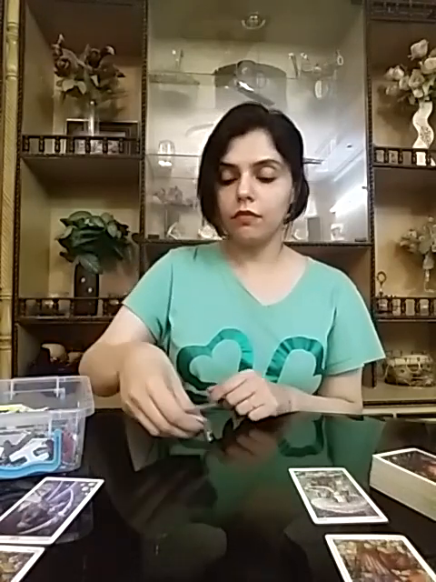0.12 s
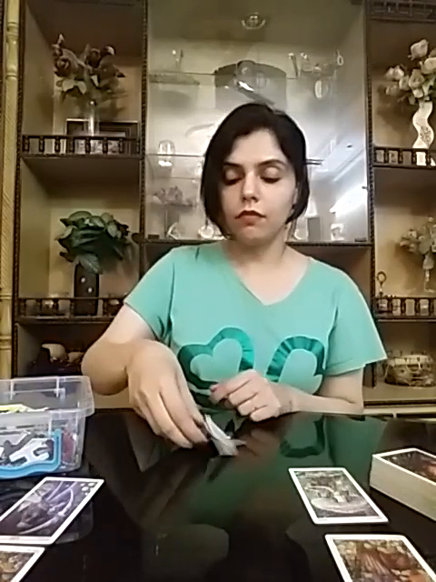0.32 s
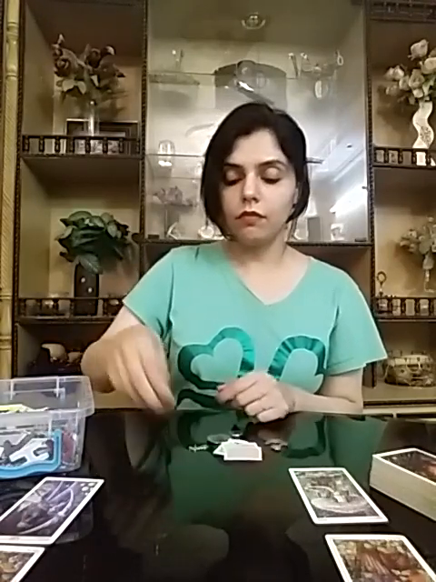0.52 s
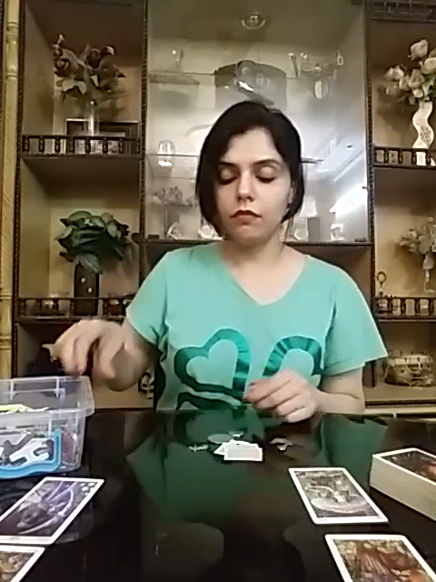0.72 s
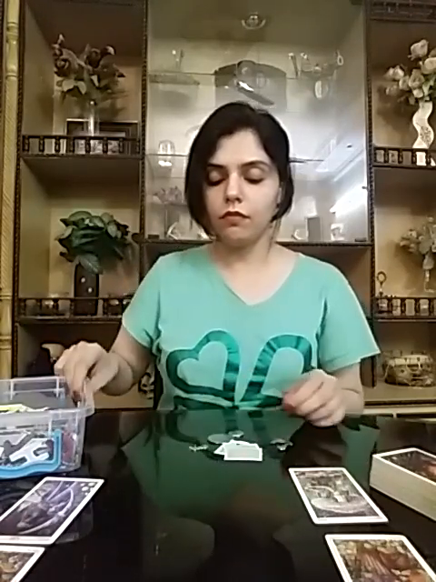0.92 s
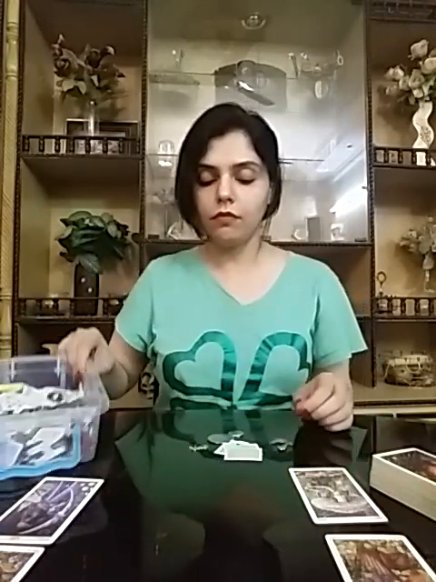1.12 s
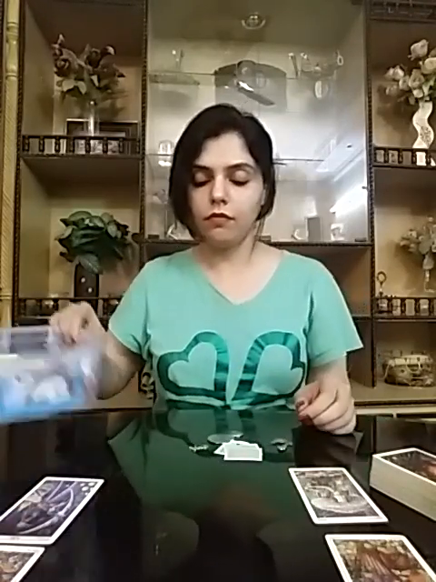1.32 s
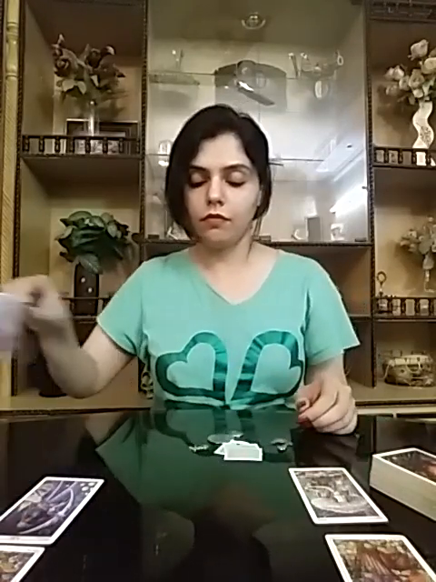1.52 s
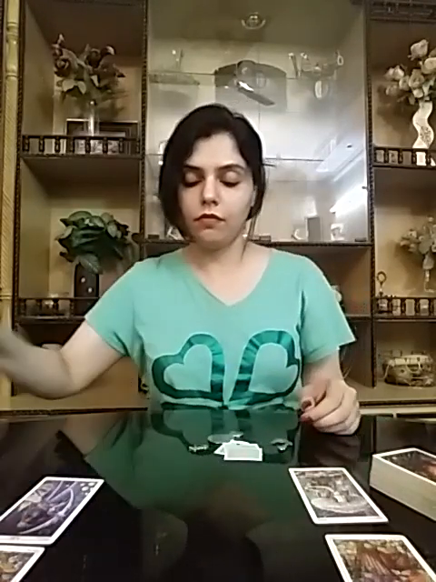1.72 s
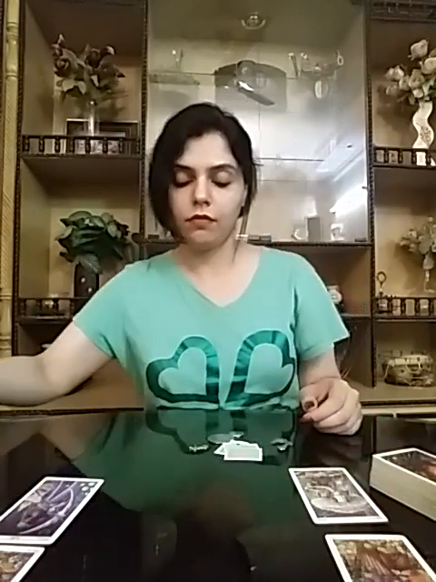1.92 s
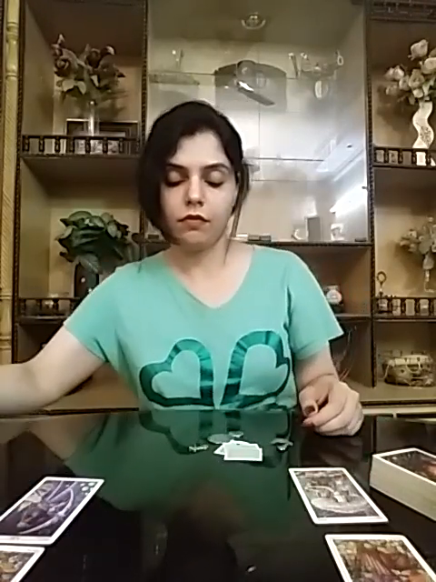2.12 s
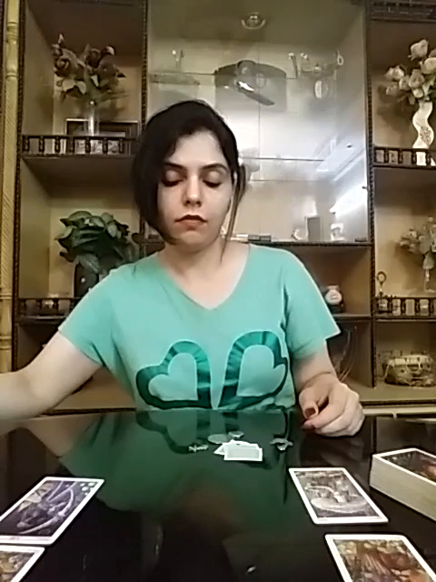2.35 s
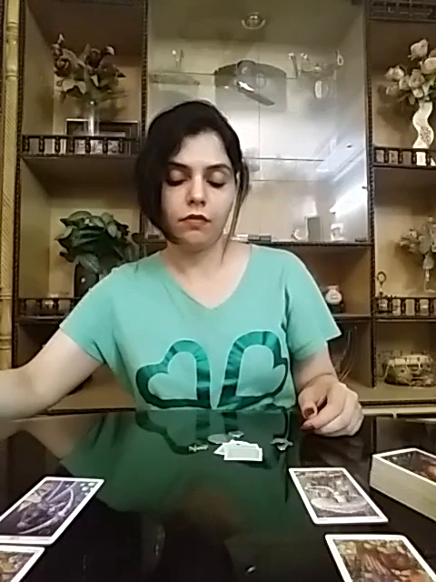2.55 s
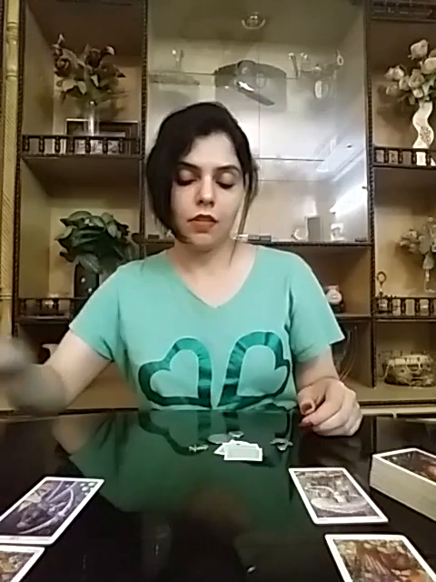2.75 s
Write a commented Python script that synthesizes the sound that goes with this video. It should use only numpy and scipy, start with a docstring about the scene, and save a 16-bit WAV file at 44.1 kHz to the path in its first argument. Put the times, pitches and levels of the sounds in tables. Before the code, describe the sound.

Small metal charms clatter onto a hard tabletop, then their plastic box is clacked down nearby

```python
"""A handful of small metal charms drops on a hard tabletop: random taps shaped into clatter, with ringing modes,
then a fine shiver to rest. Their plastic box is picked up, knocked by the fingers, the charms left inside
sliding and clicking; its plastic snaps once. Last, it is set down with two sharp clacks, made of short
blows that thump the support and jolt the contents. Throughout, a small, live room adds decaying echoes,
and filtered noise and a wavering sine make soft room noise and a low hum."""
import sys
import numpy as np
from scipy import signal
from scipy.fft import rfft, irfft
from scipy.io import wavfile
from scipy.ndimage import uniform_filter1d

SR = 44100
rng = np.random.default_rng(int(sys.argv[2]) if len(sys.argv) > 2 else 0)


def unload_wav(signal):
    """Save mono or channel-first audio to the path in sys.argv[1] as 16-bit WAV at rate SR, clipped to [-1, 1]."""
    wavfile.write(
        sys.argv[1],
        SR,
        np.round(np.clip(np.atleast_2d(signal).T, -1, 1) * 32767).astype(np.int16),
    )


N = 123480
T = np.arange(N) / SR  # time of each sample, s

# All colours are relative: only their shape over pitch counts, and the level is set apart.
# Charms landing on the table. Each row: start in seconds, level in dB.
LANDINGS = [(.2208, -17.5), (.2365, -24.5), (.2685, -27), (.2708, -24.5), (.2802, -19), (.3062, -28),
            (.3268, -22), (.3313, -19.5), (.3445, -24), (.3610, -19.5), (.3675, -18), (.3703, -23),
            (.3877, -16.5), (.3955, -23), (.4051, -26), (.4227, -18), (.4443, -21), (.4466, -20.5),
            (.4512, -17.5), (.4689, -33), (.4850, -22), (.4925, -21), (.4996, -22), (.5027, -17),
            (.5111, -21), (.5542, -15.5), (.5562, -18.5), (.5640, -23), (.5823, -41), (.5932, -21),
            (.6011, -20), (.6035, -19.5), (.6312, -23), (.6345, -22.5), (.6500, -32), (.6646, -20)]
# Colour of a charm striking the table. Each row: pitch in Hz, level in dB.
LANDING_COLOUR = [(30, -54), (60, -36), (95, -18), (140, -21), (300, -13.5), (700, -15.5), (1200, -11.5),
                  (1650, -2.5), (2050, 2), (2500, 1), (3100, -8.5), (3850, -1), (4700, -10.5),
                  (6500, -26.5), (10000, -65), (16000, -16)]
# Modes (natural tones) of the tabletop. Each row: pitch in Hz, level before halving in dB,
# time to fade by 60 dB in seconds.
TABLE_MODES = [(1536, -46, 0.15), (1732, -46.5, 0.097), (2074, -44, .09), (2362, -47, 0.28)]
# Loudness of the small bounces between landings. Each row: time in seconds, level in dB.
BOUNCE_LEVEL = [(.22, -47), (.26, -42.5), (.32, -36.5), (.345, -31.5), (.395, -27.5), (.418, -31.5),
                (.445, -26.5), (.53, -30), (.61, -29.5), (.66, -30.5), (.69, -45), (.74, -71)]
# Colour of the small bounces. Each row: pitch in Hz, level in dB.
BOUNCE_COLOUR = [(30, -58), (60, -35), (95, -11), (140, -27), (280, -24.5), (700, -8), (1200, -11),
                 (2000, -1.5), (2600, 3.5), (3200, -3), (3900, -2.5), (4800, -8), (6600, -11),
                 (8000, -10.5), (10200, -21), (13000, -18.5), (16000, -37)]
# Loudness of the last charms shivering to rest. Each row: time in seconds, level in dB.
SHIVER_LEVEL = [(.64, -31), (.68, -38), (.755, -35), (.805, -41.5), (.819, -29), (.835, -36), (.89, -37),
                (.95, -35.5), (.972, -40), (.985, -42)]
# Colour of the shiver. Each row: pitch in Hz, level in dB.
SHIVER_COLOUR = [(60, -39), (300, -23), (800, -17), (1600, -13.5), (2450, -2), (3100, -4.5), (4600, -13),
                 (5600, -14.5), (6800, -20.5), (9000, -24.5), (12000, -28.5), (14500, -35), (15400, -24),
                 (16000, -28)]
# A charm ringing as it chatters. Each row: start in seconds, length in seconds, pitch in Hz,
# level in dB within the ringing layer, change of tap strength over its length in dB.
RINGS = [(0.215, 0.022, 9060, -50, 7), (0.258, 0.16, 9030, -47.5, 1), (.222, 0.13, 11700, -54, 8),
         (.295, 0.022, 14900, -45, 0), (0.3275, 0.01, 15170, -27, -14), (0.328, 0.07, 9080, -37.5, 3),
         (0.336, 0.27, 11720, -46.5, -6), (0.358, 0.0085, 5505, -21.5, 16), (.37, .16, 15230, -44, -10),
         (0.42, 0.011, 15100, -35, 2), (0.384, 0.53, 5500, -44, -31), (0.397, 0.14, 5740, -43.5, 17),
         (0.456, 0.0027, 8960, -22.5, -6), (0.489, 0.12, 8870, -34.5, -1), (0.614, 0.0051, 8900, -21, 0),
         (0.666, 0.051, 8970, -49, -35)]
# Fingers knocking the box as it is lifted. Each row: start in seconds, level in dB.
KNOCKS = [(.9928, -28.5), (.9962, -40.5), (1.1724, -32), (1.1765, -35.5), (1.187, -44), (1.4428, -44)]
# Colour of a knock. Each row: pitch in Hz, level in dB.
KNOCK_COLOUR = [(40, -30), (95, 0), (150, -13), (260, -1.5), (450, -0.5), (800, 2.5), (1150, -7.5),
                (1600, -7.5), (2300, -16), (4000, -17), (6500, -26), (16000, -63)]
# Charms clicking inside the box. Each row: start in seconds, level in dB.
CLICKS = [(1.1335, -42.5), (1.140, -39), (1.156, -58), (1.2605, -40), (1.335, -63), (1.432, -55),
          (1.4430, -33), (2.0505, -66)]
# Colour of a click. Each row: pitch in Hz, level in dB.
CLICK_COLOUR = [(100, -18), (600, -15), (1100, 5), (1600, -1), (2400, 11), (3100, -4), (3900, -16),
                (5200, -3), (6500, -31), (16000, -34)]
# Charms sliding in the carried box. Each row: time in seconds, level in dB within the sliding layer.
SLIDE_LEVEL = [(1.11, -59), (1.13, -41.5), (1.145, -43.5), (1.20, -40.5), (1.255, -50), (1.30, -52),
               (1.32, -42), (1.365, -50), (1.41, -44), (1.45, -46), (1.50, -56.5), (1.94, -72.5),
               (1.98, -50), (2.03, -69), (2.056, -44.5), (2.09, -63)]
# Colour of the sliding. Each row: pitch in Hz, level in dB.
SLIDE_COLOUR = [(100, -14), (400, -5.5), (800, 1), (1150, -5.5), (1600, -1), (2400, 0.5), (3100, -6),
                (4000, -5.5), (5300, -15.5), (6500, -27), (16000, -36.5)]
# Modes of the box's plastic as it snaps. Each row: pitch in Hz, level within the ring in dB,
# time to fade by 60 dB in seconds.
SNAP_MODES = [(620, -12, 0.064), (1480, -2, 0.03), (2130, -5, 0.029), (2330, -4, 0.031), (2700, -22, .016),
              (3900, -9, 0.026)]
# Colour of the snap's tick. Each row: pitch in Hz, level in dB.
SNAP_TICK_COLOUR = [(100, -19), (600, 1), (2000, 17), (4000, -20), (7000, -8), (16000, -25)]
# The box set down. Each row: start in seconds, then the levels of the clack, the thump
# and the jolt of the contents in dB.
SET_DOWN = [(2.3103, -19, -18, -19), (2.3250, -24, -34, -22.5), (2.358, -24, -30.5, -34),
            (2.508, -15.5, -29.5, -27)]
# The contents falling back after the jolt. Each row: start in seconds, level in dB.
FALL_BACK = [(2.3126, -20.5), (2.5178, -24.5), (2.5195, -35)]
# Colour of a clack. Each row: pitch in Hz, level in dB.
CLACK_COLOUR = [(60, -26), (200, -16), (400, -10.5), (620, -3), (850, 4.5), (1080, 2), (1500, -1),
                (2300, -4.5), (3000, -8), (4100, -14.5), (5200, -15.5), (7500, -36), (16000, -73)]
# Colour of a thump. Each row: pitch in Hz, level in dB.
THUMP_COLOUR = [(30, -25), (55, -40), (85, 0), (120, -7.5), (170, -14.5), (230, -8.5), (370, -6),
                (550, -5.5), (800, -30), (2000, -45), (16000, -55)]
# Colour of the jolted contents. Each row: pitch in Hz, level in dB.
JOLT_COLOUR = [(100, -12.5), (600, -1), (1100, -10), (1700, -2), (2300, 1), (2750, -3.5), (3300, -1.5),
               (4100, -4), (4900, -22), (7000, -25.5), (10000, -36.5), (14500, -40), (16000, -41)]
# How long the room's echoes last. Each row: pitch in Hz, time to fade by 60 dB in seconds.
ROOM_DECAY = [(100, 1.13), (260, .5), (700, 0.54), (1840, 0.4), (4850, 0.5056), (9000, 0.5742),
              (16000, 1.05)]
# Colour of the room noise. Each row: pitch in Hz, level in dB.
NOISE_COLOUR = [(25, -8), (50, -6.5), (75, -2), (105, 1.5), (150, 2.5), (200, -4), (300, -4), (500, -8.5),
                (1000, -11.5), (2000, -19), (4200, -18.5), (5200, -36.5), (9000, -31), (16000, -31.5)]

BOUNCES_PER_S, SHIVERS_PER_S, SLIDES_PER_S = 1800, 1500, 1200  # average number of tiny impacts
RING_T60_S, RING_TAPS_PER_S = 0.079, 600
RING_SPREAD = 0.011  # largest share of its pitch by which each mode of a pair strays
BEND_S, BEND_HZ = 0.000695, 2016  # travel time of a bending wave of this pitch; lower ones arrive later
SNAP_S, SNAP_DB, SNAP_TICK_DB = 1.6313, -32, -38.5
JOLT_T60_S, JOLT_LAG_S = 0.084, 0.001238
NOISE_DB, HUM_HZ, HUM_DB = -57, 147, -63.5
CEILING, LOW_CUT_HZ, EDGE_HZ = 0.38, 66, 15850  # CEILING is a sample value where 1 is full scale


def amp(db):
    """Turn decibels into a gain."""
    return 10 ** (np.asarray(db) / 20)


def unit(x):
    """Scale a sound to an average (RMS) level of 1."""
    return x / np.sqrt(np.mean(x ** 2) + 1e-20)


def read(points, hz):
    """Read a table at any pitch, along a logarithmic pitch scale."""
    f, value = np.transpose(points)
    return np.interp(np.log(hz + 1), np.log(f), value)


def swell(points):
    """A level curve as gain, practically silent outside its ends."""
    s, db = np.transpose(points)
    return amp(np.interp(T, s, db, left=-140, right=-140))


def through(x, response):
    """Let every sample of x set off the response (convolution)."""
    return signal.oaconvolve(x, response)[:N]


def pulse(colour):
    """The click of a bending plate with this colour, of level 0 dB over two milliseconds."""
    hz = np.fft.fftfreq(4096, 1 / SR)
    # this phase delays each pitch by BEND_S * sqrt(BEND_HZ / pitch)
    bend = np.sign(hz) * 2 * np.pi * 2 * BEND_S * np.sqrt(BEND_HZ * abs(hz))
    log_gain = np.log(amp(read(colour, abs(hz))))
    # the Hilbert transform gives the phase that starts the click as early as its colour allows
    spectrum = np.exp(np.conj(signal.hilbert(log_gain)) - 1j * bend)
    click = np.fft.ifft(spectrum).real[:2048]
    return click / np.linalg.norm(click) * np.sqrt(0.002 * SR)


def blows(rows, chatter_db, t60):
    """One impulse per row, each trailed by its own dying chatter of noise."""
    t = np.arange(SR // 5) / SR
    out = np.zeros(N + SR)
    noises = rng.standard_normal((len(rows), len(t)))
    for (start, db), noise in zip(rows, noises):
        blow = noise * amp(-60 * t / t60)
        blow *= amp(chatter_db) / np.linalg.norm(blow)  # chatter level against the impulse
        blow[0] = 1
        out[round(start * SR):][:len(t)] += amp(db) * blow / np.linalg.norm(blow)
    return out[:N]


def contacts(per_s, spread_db):
    """Random tiny impacts of uneven strength and either sign."""
    size = amp(spread_db * np.minimum(rng.exponential(1, N), 3))
    sign = rng.choice([-1, 1], N)
    happens = rng.random(N) < per_s / SR
    return unit(size * sign * happens)


def ring(modes):
    """The sum of these decaying modes, like a struck solid humming at its natural pitches."""
    t = T[:SR // 4]
    return sum(amp(db - 60 * t / t60) * np.cos(2 * np.pi * hz * t) for hz, db, t60 in modes)


def room(x, wet_db, rise_s):
    """The direct sound plus a diffuse tail of noise that builds up, then fades at its own pace per pitch."""
    hz, t, z = signal.stft(rng.standard_normal(SR), SR, nperseg=256)
    fade = amp(-60 * t / read(ROOM_DECAY, hz)[:, None])
    tail = signal.istft(z * fade, SR, nperseg=256)[1][:SR]
    tail = tail * (1 - np.exp(-(T[:SR] / rise_s) ** 2))
    return x + amp(wet_db) * through(x, tail / np.linalg.norm(tail))


def tabletop(x):
    """Impacts plus the short ring they stir up in the tabletop."""
    return x + through(x, ring(TABLE_MODES) / 2)


def falling_charms():
    """Hard landings, a spray of small bounces, then a fine shiver, all made of short impacts."""
    landings = blows(LANDINGS, chatter_db=1.5, t60=0.028)
    landings = tabletop(through(landings, pulse(LANDING_COLOUR)))
    bounces = through(contacts(BOUNCES_PER_S, spread_db=-0.5), pulse(BOUNCE_COLOUR))
    bounces = unit(tabletop(bounces))
    shiver = unit(through(contacts(SHIVERS_PER_S, spread_db=1), pulse(SHIVER_COLOUR)))
    return landings + bounces * swell(BOUNCE_LEVEL) + shiver * swell(SHIVER_LEVEL)


def ringing_charms():
    """Quick contacts excite a close pair of high modes in each charm."""
    out, t = np.zeros(N), T[:SR // 6]
    for start, length, hz, db, change_db in RINGS:
        progress = (T - start) / length  # 0 at the start, 1 at the end
        during = (progress >= 0) * (progress < 1)
        taps = rng.standard_normal(N) * (rng.random(N) < RING_TAPS_PER_S / SR) * during
        taps[round(start * SR)] = 1
        taps = taps * amp(change_db * np.clip(progress, 0, 1))
        pair = 0
        for side in (-1, 1):  # one mode below the pitch, one above
            mode_hz = hz * (1 + side * RING_SPREAD * rng.random())
            pair = pair + np.sin(2 * np.pi * mode_hz * t)
        tone = through(taps, pair * amp(-60 * t / RING_T60_S))
        out += amp(db) * tone / np.linalg.norm(tone) * np.sqrt(length * SR)
    return out


def carried_box():
    """Fingers knock the plastic while the charms inside slide and click in many tiny impacts."""
    knocks = through(blows(KNOCKS, chatter_db=-1.5, t60=0.026), pulse(KNOCK_COLOUR))
    clicks = through(blows(CLICKS, chatter_db=7, t60=0.015), pulse(CLICK_COLOUR))
    slide = unit(through(contacts(SLIDES_PER_S, spread_db=2.0), pulse(SLIDE_COLOUR)))
    contents = clicks + amp(-5) * slide * swell(SLIDE_LEVEL)
    return room(knocks, wet_db=-3, rise_s=0.0069) + room(contents, wet_db=-7.5, rise_s=0.0031)


def box_snap():
    """The plastic snaps once under the grip: a tick, and modes that ring briefly."""
    hit = np.zeros(N)
    hit[round(SNAP_S * SR)] = 1
    body = signal.lfilter(*signal.butter(3, 4000, fs=SR), through(hit, ring(SNAP_MODES)))  # soften the treble
    tick = through(hit, pulse(SNAP_TICK_COLOUR))
    return room(amp(SNAP_DB) * body + amp(SNAP_TICK_DB) * tick, wet_db=-9.5, rise_s=0.008)


def box_set_down():
    """The box clacks down edge by edge, thumps its support and jolts its contents, which fall back."""
    rows = np.array(SET_DOWN)
    clack = through(blows(rows[:, [0, 1]], chatter_db=-3, t60=0.0056), pulse(CLACK_COLOUR))
    thump = through(blows(rows[:, [0, 2]], chatter_db=-0.5, t60=0.082), pulse(THUMP_COLOUR))
    # the contents follow a moment later, nearly all chatter
    jolt = blows(rows[:, [0, 3]] + [JOLT_LAG_S, 0], chatter_db=34, t60=JOLT_T60_S)
    fall_back = blows(FALL_BACK, chatter_db=7, t60=0.013)
    contents = through(jolt + fall_back, pulse(JOLT_COLOUR))
    return (room(clack, wet_db=0.0, rise_s=0.0016) + room(thump, wet_db=-11, rise_s=0.012)
            + room(contents, wet_db=0.5, rise_s=0.003))


def background():
    """Soft room noise, filtered from white noise, with a low hum whose pitch wavers at random."""
    gain = amp(read(NOISE_COLOUR, np.fft.rfftfreq(N, 1 / SR)))
    noise = unit(irfft(rfft(rng.standard_normal(N)) * gain, N))
    waver = unit(uniform_filter1d(rng.standard_normal(N), size=4000))
    hum_hz = HUM_HZ * (1 + 0.023 * waver)
    hum = np.sin(2 * np.pi * np.cumsum(hum_hz) / SR)
    return amp(NOISE_DB) * noise + amp(HUM_DB) * hum


def scene():
    """All sources added up in one channel."""
    charms = falling_charms() + amp(-3.5) * ringing_charms()
    table = room(charms, wet_db=-3.5, rise_s=0.0058)
    return (table + carried_box() + box_snap() + box_set_down() + background())[None]


def record(dry):
    """The loudest peaks are rounded off; then the microphone's low cut and the band limit."""
    rounded = dry / (1 + (dry / CEILING) ** 4) ** 0.25
    low_cut = signal.butter(3, LOW_CUT_HZ, "high", fs=SR, output="sos")
    band_limit = signal.firwin(511, EDGE_HZ, window=("kaiser", 9), fs=SR)
    return signal.oaconvolve(signal.sosfilt(low_cut, rounded), band_limit[None], "same")


dry = scene()
out = record(dry)
unload_wav(out)
```